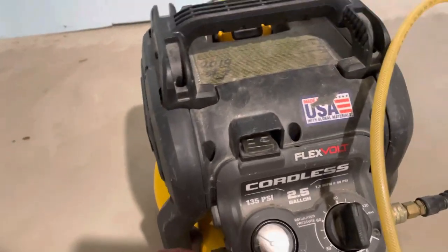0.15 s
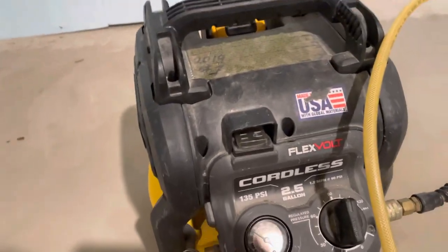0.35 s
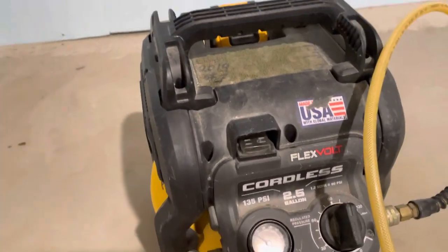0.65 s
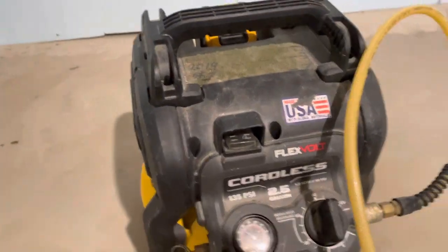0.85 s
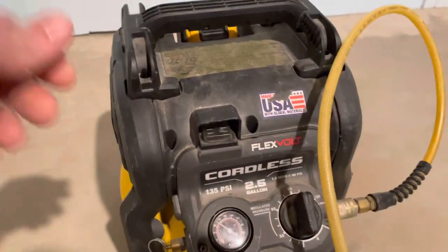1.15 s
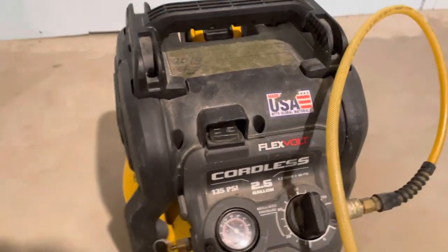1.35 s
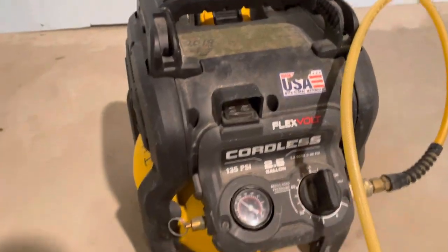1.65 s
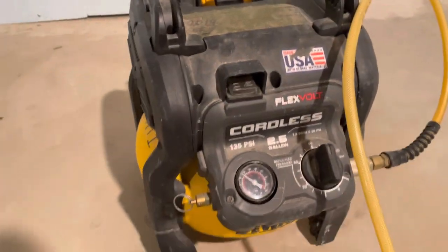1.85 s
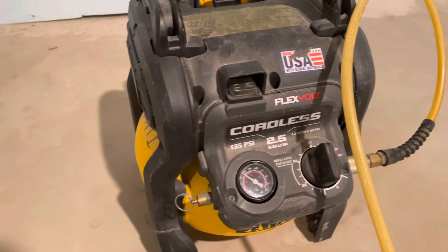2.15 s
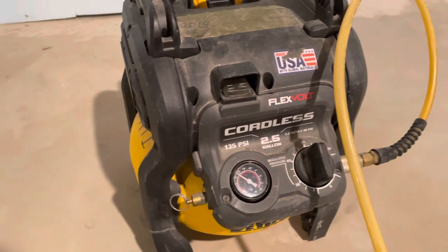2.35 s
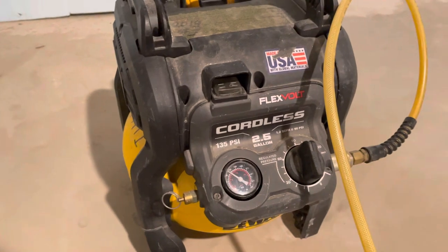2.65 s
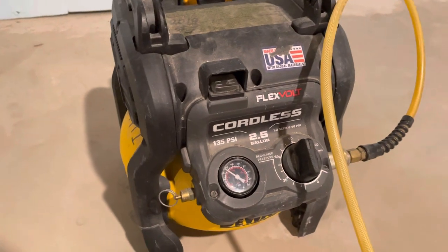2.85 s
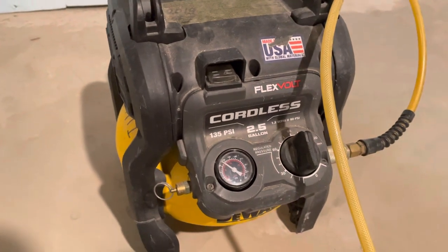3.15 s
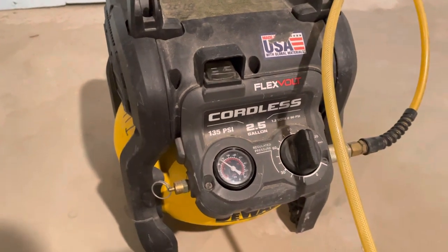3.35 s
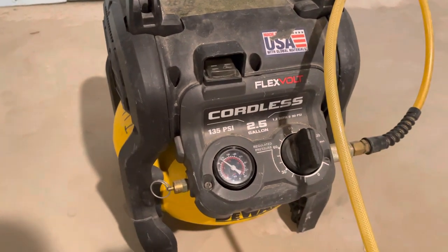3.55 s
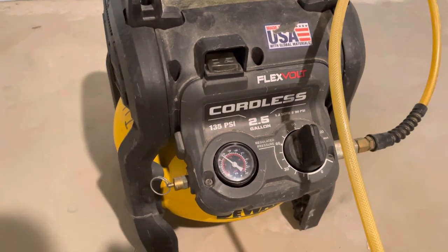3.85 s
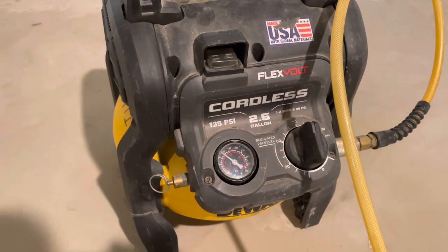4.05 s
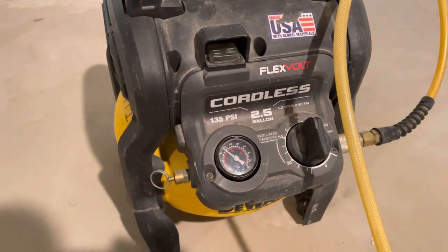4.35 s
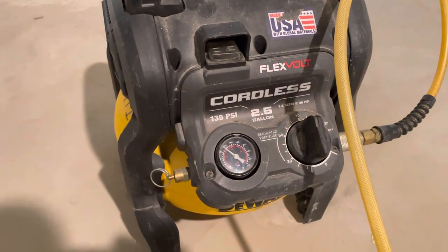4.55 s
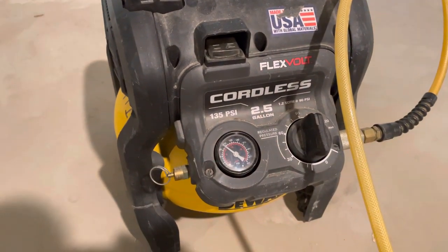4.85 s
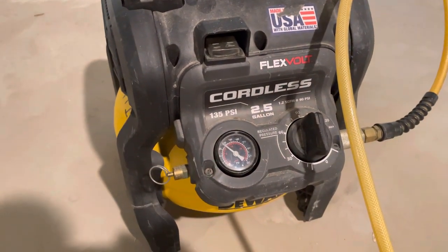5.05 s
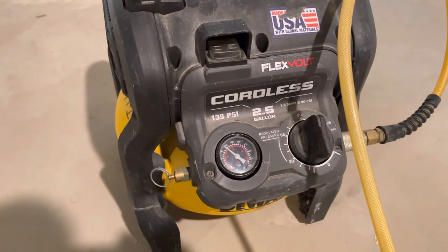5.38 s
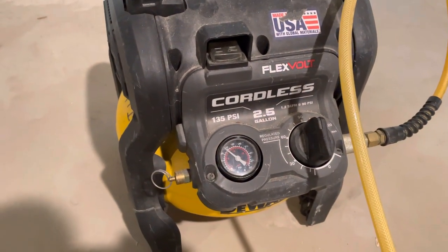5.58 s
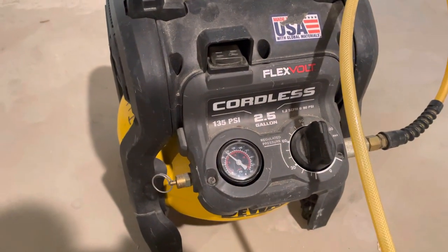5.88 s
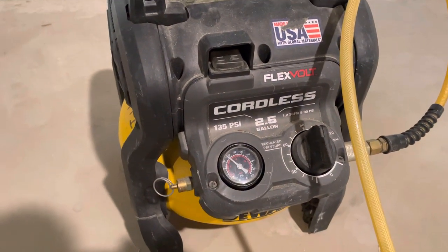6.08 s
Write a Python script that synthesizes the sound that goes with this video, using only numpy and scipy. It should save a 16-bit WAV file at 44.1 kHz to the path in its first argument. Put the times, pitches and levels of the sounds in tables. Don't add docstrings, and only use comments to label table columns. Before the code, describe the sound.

A small portable piston compressor is already running at constant speed on a concrete floor, heard close by a stereo phone. From 0 to 0.5 s it is quiet and thin, mostly a dry rattle with little bass and a slightly shaded top. Between 0.5 and 1 s the airy noise opens up and the low hum fills in underneath; brief metallic buzzes flicker until about 1.9 s. From 1 to 2.2 s the tone colour shifts as the phone swings from side to front. After that a dense, rough drone of about 57 strokes per second holds its pitch, with strong low-mid throbbing, pulsing air rush, thin hiss and a faint steady high buzz. Panel and gear whines swell and fade, notably around 3 to 4 s and after 5 s. Loudness climbs throughout, ending loud and still running at about 6.2 s.

```python
import sys
import numpy as np
from scipy import signal
from scipy.fft import rfft, irfft
from scipy.io import wavfile
from scipy.ndimage import uniform_filter1d, map_coordinates

SR = 44100
rng = np.random.default_rng(int(sys.argv[2]) if len(sys.argv) > 2 else 0)


def nominal_scale(level):
    x = np.asarray(level, float) / 20
    return 10 ** x


def output_pcm(signal):
    pcm = np.clip(np.atleast_2d(signal).T, -1, 1) * 32767
    wavfile.write(sys.argv[1], SR, np.round(pcm).astype(np.int16))


N = 274302
CRANK_HZ = 56.601
FRAMES, POINTS = 125, 16384


def colour(points, hz):
    f, db = np.transpose(points)
    return nominal_scale(np.interp(np.log(np.maximum(hz, 1)), np.log(f), db))


def curves(table, t):
    s, *columns = np.transpose(table)
    return np.array([np.interp(t, s, c) for c in columns])


def walk(shape, steps):
    w = rng.standard_normal(shape)
    for _ in range(2):
        w = uniform_filter1d(w, steps, axis=0)
    return w / w.std()


def controls(t):
    # (time [s], intake level [dB])
    gain_creep = [(0, -38.5), (0.9, -36.5), (2.0, -32.5), (3.6, -28.5), (4.9, -25.5), (6.22, -23.5)]
    shade = np.clip(1 - (t - 0.45) / 0.41, 0, 1)
    return curves(gain_creep, t)[0], -17.5 - 2.5 * shade


def low_cut(hz, t):
    corner_hz = 760 * np.exp(-t / 0.48)
    octaves_under = np.log2(corner_hz[:, None] / np.maximum(hz, 150))
    return nominal_scale(-np.clip(7.5 * octaves_under, 0, 10))


def air(mid_points, side_points, puff, alike=0.61, side_turn=1.0, flicker_db=1.0, ripple_db=4.0):
    hz = np.arange(N // 2 + 1) * SR / N
    noise = rng.standard_normal((2, N))
    flicker = nominal_scale(flicker_db * walk(N, 860))
    shared, own = rfft(noise * puff * flicker)
    other = alike * np.exp(1j * side_turn) * shared + np.sqrt(1 - alike ** 2) * own
    ripple = nominal_scale(ripple_db * walk(len(hz), 175))
    mid = shared * colour(mid_points, hz)
    side = other * colour(side_points, hz)
    return irfft(ripple * np.array([mid, side]), N)


def rush(puff, intake_db, housing_db):
    # (frequency [Hz], level [dB per Hz])
    rush_mid = [(30, -21), (200, -14.5), (350, -10), (650, -3.5), (830, -3.5), (900, -10.5), (1500, -13.5),
                (2000, -15.5), (2600, -14), (3600, -11.5), (5500, -14), (7000, -18), (7520, -23),
                (7700, -65)]
    rush_side = [(30, -36), (300, -27), (650, -13), (800, -20), (1400, -32), (1600, -29), (1950, -13.5),
                 (2300, -12), (3600, -13.5), (5500, -26), (6200, -44), (6600, -18), (9000, -17),
                 (10400, -32), (10600, -70)]
    return air(rush_mid, rush_side, puff) * nominal_scale(18 + intake_db + 1.19 * housing_db)


def hiss(puff, intake_db):
    # (frequency [Hz], level [dB per Hz])
    hiss_mid = [(8500, -40), (8750, -27), (10500, -24.5), (11600, -27.5), (12000, -35), (13500, -40),
                (13700, -59)]
    hiss_side = [(13000, -54), (13800, -34), (15700, -37), (15800, -80)]
    return air(hiss_mid, hiss_side, puff) * nominal_scale(intake_db)


def buzz(turn, intake_db, sharp=0.16, side_db=-7):
    # (from [s], to [s], frequency [Hz], width [Hz], level against the intake [dB])
    loose_parts = [(.1, .5, 4150, 200, -32), (.1, .45, 3000, 150, -31), (.63, .98, 4150, 200, -30),
                   (.72, 1.3, 3170, 150, -26), (1.53, 1.85, 3940, 160, -24), (1.45, 1.85, 3620, 160, -27),
                   (1.75, 6.5, 3950, 70, -31), (3.55, 3.8, 3700, 200, -26), (4.0, 4.2, 3900, 200, -26),
                   (2.5, 6.5, 5980, 60, -37), (3.0, 6.5, 6690, 50, -40), (3.0, 6.5, 7150, 50, -44)]
    t, out = np.arange(N) / SR, 0
    for t0, t1, hz, width, db in loose_parts:
        band = signal.butter(2, [hz - width / 2, hz + width / 2], "band", fs=SR, output="sos")
        ring = signal.sosfilt(band, rng.standard_normal(N))
        gate = np.clip((t - t0) / .04, 0, 1) * np.clip((t1 - t) / .12, 0, 1)
        out = out + nominal_scale(db) * gate * ring / ring.std()
    stroke = np.exp(sharp * (np.cos(2 * np.pi * (turn - .05)) - .5))
    out = out * nominal_scale(intake_db) * stroke
    return np.array([out, nominal_scale(side_db) * out])


def clatter(order, housing_db, uneven, drift, scatter_db=4.0, drift_db=5.0):
    # (frequency [Hz], level against the housing [dB])
    clatter_points = [(3400, -34), (3700, -19), (4450, -34), (4950, -23.5), (5740, -26.5), (6300, -51),
                      (7300, -34.5), (7500, -70)]
    level_db = housing_db[:, None] + scatter_db * uneven + drift_db * drift
    return colour(clatter_points, order * CRANK_HZ) * nominal_scale(level_db) * (order % 1 == 0)


def add_strokes(gain, t, drift, steady_db=0.4153):
    # (from the side [dB], from
    # the front [dB])
    pump = [(-17.5, -17.5), (-19.5, -19), (-37.5, -31), (-11, -12), (-11.5, -10), (-33.5, -30.5),
            (-14.5, -18.5), (-15, -15), (-9, -23.5), (-4, -6.5), (-6.5, -6.5), (-2.5, -3), (-11, -17.5),
            (-16, -14), (-29, -30), (-35, -56), (-29, -34), (-33, -23), (-30, -29.5), (-43, -35),
            (-35, -36), (-26.5, -44), (-24.5, -34.5), (-33, -30), (-37.5, -26.5), (-53, -71), (-44, -59),
            (-35, -26), (-36, -25), (-36, -36.5),
            (-40, -62), (-45, -48), (-36, -30), (-36, -45.5), (-38, -67), (-50, -51), (-47, -40),
               (-31, -33), (-47, -30), (-53, -33.5), (-39, -56), (-53, -63), (-29, -30.5), (-33, -45),
               (-48, -40), (-51, -36), (-37, -34.5), (-40, -34.5), (-50, -38), (-40, -33), (-46, -36),
               (-46, -39), (-28, -39), (-35, -56), (-53, -30.5), (-32, -33), (-45, -43), (-48, -61),
               (-44, -33), (-56, -39)]
    # (half multiple of the crank, from the side [dB], from the front [dB])
    belt = [(5.5, -43, -42), (9.5, -36, -40), (10.5, -41, -42), (11.5, -39, -41), (13.5, -38, -35),
            (14.5, -34, -31), (17.5, -34, -41), (18.5, -37, -39), (19.5, -33, -32), (21.5, -28, -30),
            (22.5, -42, -42), (23.5, -38, -39), (24.5, -49, -42), (28.5, -40, -40)]
    # (time [s], share of the front view [0-1])
    view = [(0, 0.2), (1.05, 0.24), (1.5, 0.66), (2.2, 0.92), (6.22, 1)]
    front = curves(view, t)[0]
    whole = [(k + 1, *row) for k, row in enumerate(pump)]
    half = [(int(k) + .5, a, b) for k, a, b in belt]
    for k, side_db, front_db in whole + half:
        j = int(2 * k)
        unsteady_db = steady_db * (1 + k / 12) * drift[:, j]
        gain[:, j] = nominal_scale(side_db + front * (front_db - side_db) + unsteady_db)


def add_swells(gain, t, drift):
    # (loudest at [s], reach [s], multiple of the crank, level against the intake [dB])
    swells = [(.1, .9, 28, -25), (.2, 1.3, 53, -28), (.5, .8, 16, -25), (.97, .4, 56, -25),
              (1.15, .45, 43, -19.5), (1.3, .45, 88, -29), (1.5, 4, 44, -28), (1.6, .45, 80, -28),
              (1.6, .5, 63, -29), (1.7, .4, 70, -26), (1.8, .6, 69, -27), (2.4, .8, 94, -31),
              (2.55, .45, 92, -28), (2.6, .55, 87, -25), (3, 3, 55, -31), (3, 1.2, 85, -30),
              (3.3, 1.3, 66, -24), (3.4, 1.5, 43, -24), (3.5, .45, 70, -28), (3.8, 1.1, 88, -27),
              (3.9, 1.4, 61, -20), (3.9, .75, 45, -27), (4, 3, 67, -29), (4.4, 1.6, 98, -31),
              (4.8, 2.1, 51, -30), (5.2, 2.1, 63, -27), (5.4, 1.4, 101, -28), (5.6, 1.5, 57, -28),
              (5.7, 1.1, 64, -21), (6.1, 1.2, 66, -25)]
    for top, reach, k, db in swells:
        away = (t - top) / reach
        j = 2 * int(k)
        gain[:, j] = np.maximum(gain[:, j], nominal_scale(db - 0.67 - 7 * away ** 2 + 1.2 * drift[:, j]))


def valve_phases():
    valves = [
        (0.43, 10.63, -5.79, 0.24, -1.57),
        (0.55, 11.52, 3.22, 0.57, 0.39),
        (0.44, 5.65, -2.83, 4.93, -0.54),
        (0.1, 2.18, -0.79, 0.02, 4.86),
        (0.21, 5.94, -1.28, 0.46, -0.37),
    ]
    u, cycle = np.arange(POINTS) / POINTS, 0
    for start, ring, growth, length, size in valves:
        v = (u - start) % 1
        shut = 1 + np.exp((v - length) / .012)
        cycle = cycle + size * np.exp(growth * v) * np.sin(2 * np.pi * ring * v) / shut
    return np.angle(rfft(cycle))


def machine(turn, wander=0.47, side_turn=0.17, side_scatter=0.57):
    # (frequency [Hz], level [dB])
    tone_side = [(57, -17.5), (113, -20.5), (226, -19), (283, -12.5), (450, -13), (600, -12), (720, -18.5),
                 (790, -43), (1400, -53), (1550, 7.5), (1900, -35), (3500, -2), (7300, -7.5)]
    t = np.linspace(0, N / SR, FRAMES)
    intake_db, housing_db = controls(t)
    order = np.arange(264) / 2
    hz = order * CRANK_HZ
    uneven, own_timing, side_chance = rng.standard_normal((3, len(order)))
    drift = walk((FRAMES, len(order)), 10)
    gain = clatter(order, housing_db, uneven, drift)
    add_strokes(gain, t, drift)
    add_swells(gain, t, drift)
    gain *= low_cut(hz, t) * nominal_scale(intake_db[:, None])
    gain[:, 0] = 0

    loose = (order > 14) | (order % 1 > 0)
    timing = np.where(loose, 9 * own_timing, valve_phases()[order.astype(int)])
    mid = gain * np.exp(1j * (timing + wander * hz / 4000 * walk(gain.shape, 9)))
    side_phase = (hz > 1450) * (side_turn + side_scatter * side_chance)
    side = mid * colour(tone_side, hz) * np.exp(1j * side_phase)

    where = [np.arange(N) / N * (FRAMES - 1), turn / 2 % 1 * POINTS]
    rows = []
    for spectrum in (mid, side):
        wave = irfft(spectrum, POINTS) * POINTS / np.sqrt(2)
        closed = np.c_[wave, wave[:, 0]]
        rows.append(map_coordinates(closed, where, order=1, mode="nearest"))
    return np.array(rows)


def scene():
    # (time [s], left minus right [dB])
    lean_curve = [(0, -1.6), (.75, -1), (1.75, -0.75), (2.6, -0.5), (6.22, -1)]
    t = np.arange(N) / SR
    intake_db, housing_db = controls(t)
    turn = CRANK_HZ * t + .026 + 0.00036 * walk(N, 800)
    puff = nominal_scale(2.2 * np.cos(2 * np.pi * (turn - .97)) + 1.3 * np.cos(8 * np.pi * (turn - .05)))
    moving_air = rush(puff, intake_db, housing_db) + hiss(puff, intake_db)
    mid, side = moving_air + machine(turn) + buzz(turn, intake_db)
    lean = nominal_scale(curves(lean_curve, t)[0] / 2)
    return np.array([(mid + side) * lean, (mid - side) / lean])


def low_pass(x):
    return signal.sosfilt(signal.butter(12, 15760, fs=SR, output="sos"), x)


def record(dry):
    return low_pass(dry)


dry = scene()
out = record(dry)
output_pcm(out)
```